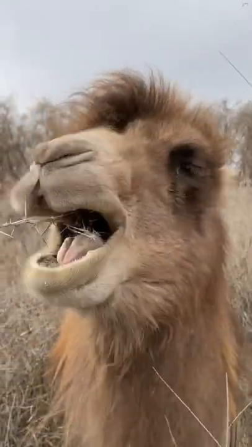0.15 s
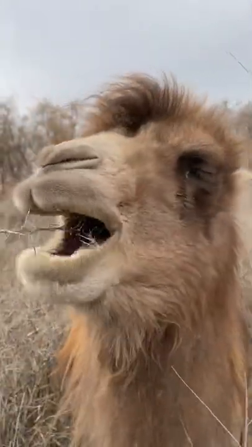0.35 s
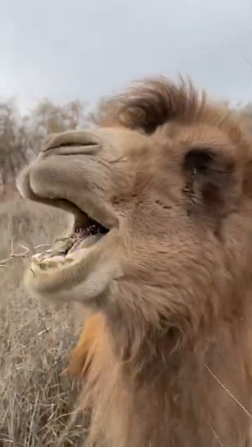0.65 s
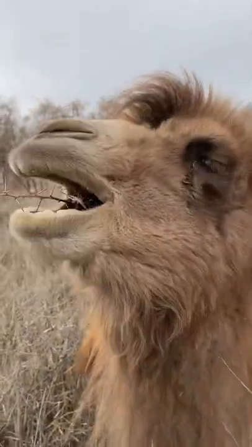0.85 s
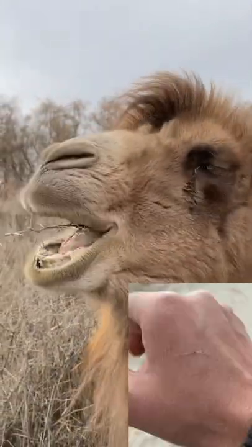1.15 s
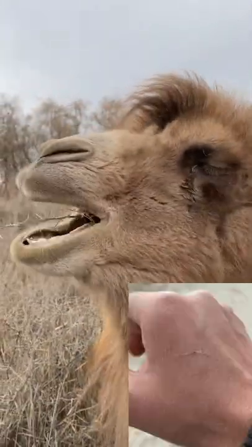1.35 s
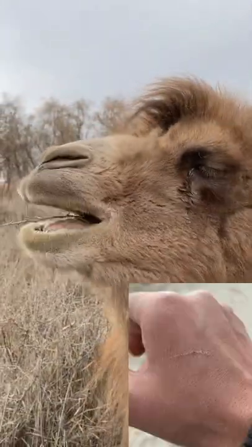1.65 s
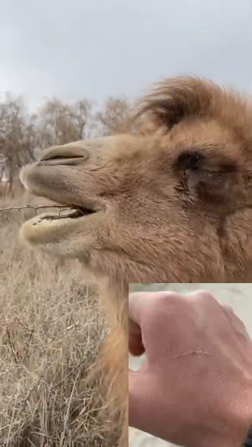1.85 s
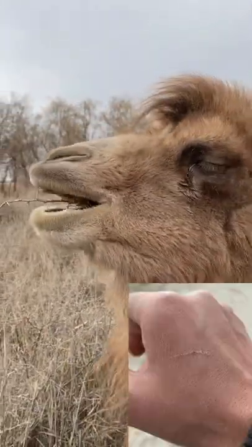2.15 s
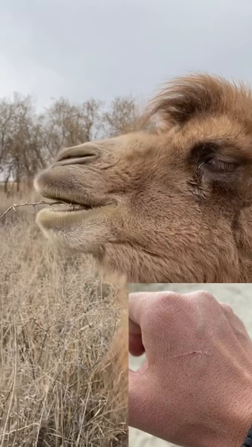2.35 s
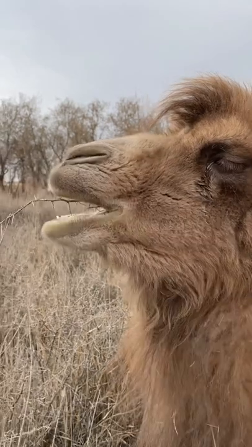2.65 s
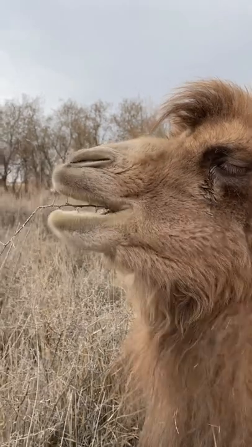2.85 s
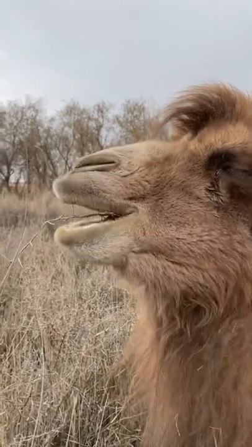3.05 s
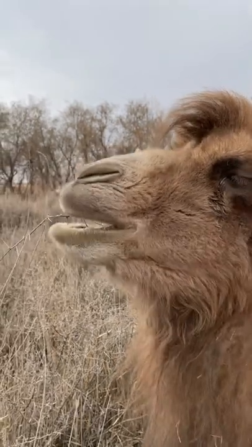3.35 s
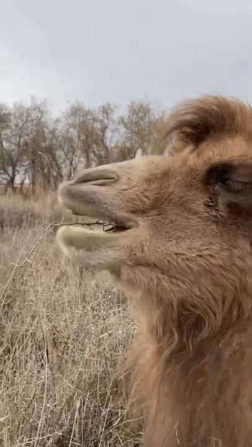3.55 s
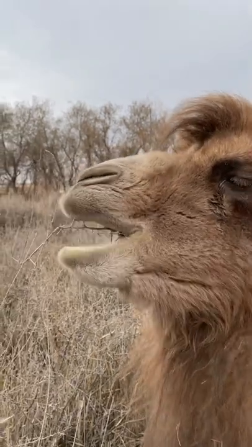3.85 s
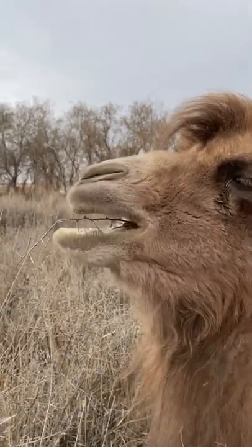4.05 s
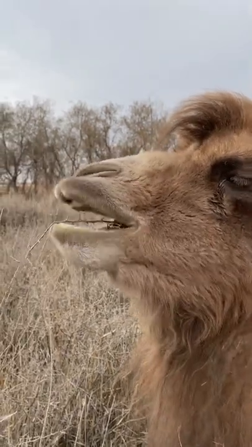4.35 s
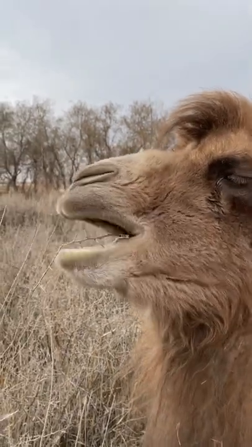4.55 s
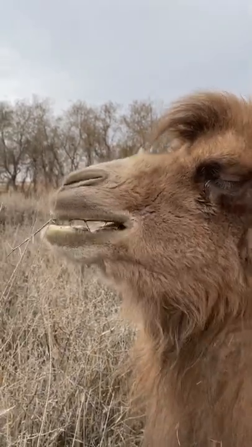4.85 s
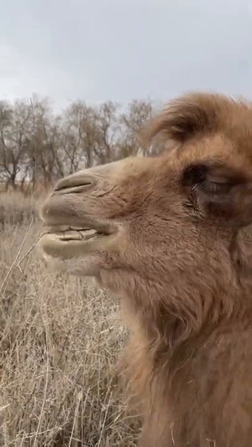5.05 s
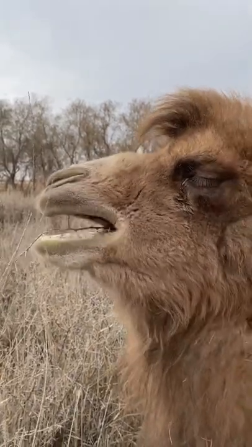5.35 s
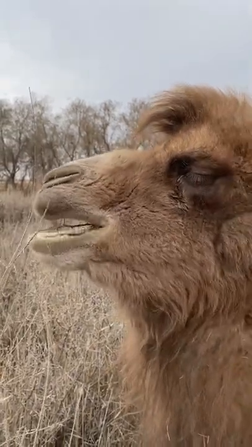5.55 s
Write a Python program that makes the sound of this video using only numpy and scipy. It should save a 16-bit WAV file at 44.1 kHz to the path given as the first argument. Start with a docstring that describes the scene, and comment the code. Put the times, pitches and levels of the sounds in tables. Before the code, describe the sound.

A camel chews dry, thorny twigs right beside a small stereo phone microphone on open, windy scrubland. At the start a few brittle crackles and faint grinding sound over low wind rumble, with a dull buffet at 0.2 s and a crisp tick at 0.33 s. Small snaps come at 1.0 and 1.13 s. Near 1.8 s the hardest, brightest snap cracks out, with crumbs and a swell of rustling stems, followed by more thin, high snaps from 2.1 to 2.9 s while the wind is quiet. From about 3 s many breaks follow at lower, woodier pitches, with a short crunch at 3.3 s. Wind thumps at 4.2 s, stems rustle at 4.4 s, then crunching strokes thicken from 4.5 to 4.8 s with soft jaw knocks and gentler wind bumps to 5.0 s. The strongest crush, with a faint creak, comes around 5.2-5.3 s, ringing hollow in the mouth, and small crackles continue to the end at 5.7 s.

```python
"""On open scrubland a camel, close to a phone with two microphone ports, chews dry thorny twigs.
From the start thorns snap, crumble and are ground over light wind that rumbles and thumps on the ports.
The hardest snap comes near 1.8 s amid rustling stems; from about 3 s many breaks ring at lower pitches.
After 4 s the wind thumps again, and toward the end the crushing is stronger and the mouth rings hollow.
Noise and clicks through resonances make the crushing and rustle; damped sines make rings, knocks and thumps."""
import sys
import numpy as np
from scipy import signal
from scipy.fft import rfft, irfft
from scipy.io import wavfile
from scipy.ndimage import uniform_filter1d

SR = 44100
rng = np.random.default_rng(int(sys.argv[2]) if len(sys.argv) > 2 else 0)


def log_audio(samples):
    """Write samples as a 16-bit WAV file to the path given in sys.argv[1]."""
    # one column per channel
    frames = np.atleast_2d(samples).T
    # limit to full scale, then quantise
    limited = np.clip(frames, -1, 1)
    pcm = np.round(limited * 32767).astype(np.int16)
    wavfile.write(sys.argv[1], SR, pcm)


N = 250488

# breaking thorns and stems: (time [s], level [dB], ring [Hz], broad crack relative to the break [dB],
# echo in the mouth relative to the break [dB])
BREAKS = [(0.004, -32.5, 1620, -15.5, -7), (0.034, -36, 2270, -17.5, 0), (0.079, -40, 5360, -13.5, -18),
          (0.276, -45, 2700, -14, -17), (0.31, -48, 3250, -11, -20), (0.3322, -26.5, 5800, -21.5, -41),
          (0.393, -47.5, 5500, -14.5, -34), (0.581, -46, 730, -39, 2), (0.662, -43, 5100, -12.5, -23),
          (0.686, -39.5, 4160, -10, -37), (1.0014, -31, 1560, -26, -11), (1.11, -45, 2600, -27, -2),
          (1.128, -27.5, 6400, -57, -34), (1.1464, -44.5, 5470, -12, -12), (1.368, -45, 5040, -7, 0),
          (1.685, -35.5, 5730, -23, -11), (1.768, -15.5, 5240, -17.5, -42), (2.115, -21.5, 5780, -35, -55),
          (2.162, -30.5, 6160, -28, -41), (2.184, -26.5, 6300, -55, -44), (2.339, -33.5, 1720, -28, -32),
          (2.3595, -46, 2000, -40, -15), (2.366, -45, 2540, 0, 7), (2.39, -32, 6040, -32, -19),
          (2.405, -43, 1810, -20, -18), (2.685, -27.5, 5980, -40, -48), (2.754, -33.5, 5930, -26.5, -35),
          (2.944, -28.5, 5860, -30, -44), (3.045, -35.5, 1950, -47, -1.5), (3.061, -44, 2100, -40, 1),
          (3.094, -40.5, 1890, -21, 0), (3.216, -36, 2300, -24, -6), (3.276, -47, 2330, 3, -14),
          (3.296, -31, 1540, -29, -8.5), (3.316, -52, 1260, -9, -1), (3.411, -46.5, 1500, -36, -2),
          (3.513, -46.5, 6400, -8, -5), (3.702, -33.5, 2210, -24.5, -8), (3.807, -28.5, 917, -28, -39),
          (3.839, -45.5, 1130, -39, 2), (3.856, -38, 5370, -47, -11), (3.908, -48, 2900, -11.5, 12),
          (3.917, -47, 1500, -12, 1), (3.931, -45, 1630, -17.5, 7.5), (3.99, -38, 3070, -31, -3),
          (4.005, -46, 1600, -20, -7), (4.051, -37, 1870, -23, 6), (4.071, -32, 2950, -26, -7),
          (4.115, -32.5, 4600, -40, -13), (4.128, -33, 2800, -26, -32), (4.152, -31, 4340, -31, -6.5),
          (4.243, -35, 2900, -11.5, 0.5), (4.287, -34, 2920, -38, -2), (4.31, -37.5, 2010, -13.5, -3),
          (4.526, -32.5, 6370, -33, -14), (4.582, -26, 2300, -21.5, -2.5), (4.608, -27, 2060, -28, 2),
          (4.682, -28.5, 1505, -53, 2.5), (4.728, -34, 1630, -51, 1.5), (4.738, -34.5, 1370, -39, -18),
          (4.776, -43, 1360, -33, -10), (4.805, -38, 6540, -8, -25), (4.8212, -43.5, 2930, -12, -10),
          (4.933, -32.5, 1265, -25, -1), (5.008, -39, 3800, -34, -9), (5.185, -49, 1400, -36, -3),
          (5.256, -24.5, 1495, -35, -8), (5.285, -36.5, 1230, -23, 3), (5.314, -28, 1190, -47, 9.5),
          (5.314, -22, 5260, -51, -35), (5.354, -44, 2480, -37, 9), (5.51, -41.5, 1710, -42, 8),
          (5.523, -41, 1560, -31, -7), (5.556, -49.5, 2980, -40, 12), (5.568, -42, 1640, -46, -17),
          (5.644, -32.5, 1980, -30, 5.5)]
# colour of dry stems: (frequency [Hz], relative level [dB])
STEM_COLOUR = [(900, -8), (2500, 0), (4500, 6.5), (6500, 12), (8800, 1.5), (12000, 9), (15400, 7),
               (16100, -99)]


def gain_of(db):
    """Amplitude factor of a level in dB."""
    return 10 ** (np.asarray(db) / 20)


def evened(x):
    """The sound brought to an rms of one."""
    return x / np.sqrt(np.mean(x ** 2) + 1e-20)


def add(mix, s, sound):
    """Lay a sound into the mix from time s, cut at the end of the mix."""
    part = mix[round(s * SR):][:len(sound)]
    part += sound[:len(part)]


def read(points, hz):
    """Read a table of values along a logarithmic frequency axis."""
    f, value = np.transpose(points)
    return np.interp(np.log(hz + 1), np.log(f + 1), value)


def level_curve(table):
    """Gain over time, with straight lines in dB between the points."""
    s, db = np.transpose(table)
    return gain_of(np.interp(np.arange(N) / SR, s, db, left=-120, right=-120))


def swells(s, length, db, rise_db_per_s, fall_db_per_s):
    """Each row swells up to its level, holds and dies away; the powers add."""
    late = np.arange(N) / SR - s[:, None]
    rise_db = np.minimum(rise_db_per_s * late, 0)
    fall_db = -fall_db_per_s * (late - length)
    slope_db = np.minimum(rise_db, fall_db)
    return np.sqrt((gain_of(db[:, None] + slope_db) ** 2).sum(0))


def coloured(x, spectrum):
    """Weight the spectrum of a sound by a table of levels."""
    hz = np.fft.rfftfreq(x.shape[-1], 1 / SR)
    return irfft(rfft(x) * gain_of(read(spectrum, hz)), x.shape[-1])


def ringing(x, hz, width):
    """A double complex pole: a resonance with steep skirts."""
    pole = np.exp((2j * np.pi * hz - np.pi * width) / SR)
    return signal.lfilter([(1 - abs(pole)) ** 2], [1, -2 * pole, pole ** 2], x)


def resonate(x, hz, width):
    """The real sound of one such resonance."""
    return 2 * ringing(x, hz, width).real


def grains(per_s, spread_db, count):
    """Sparse clicks of random sign; a few are large."""
    size = gain_of(spread_db * np.minimum(rng.exponential(1, count), 4))
    sign = rng.choice([-1., 1.], count)
    return size * sign * (rng.random(count) < per_s / SR)


def diffuse(make):
    """Sound from all around: the two ports hear partly the same, partly unrelated sound."""
    # (frequency [Hz], likeness of the two ports [0 to 1])
    likeness = [(60, .8), (200, .5), (700, .3), (2000, .5), (5000, .6), (7000, .98), (9300, .85),
                (11000, .98), (12600, .8), (14000, .98)]
    left, other = rfft(make()), rfft(make())
    alike = np.clip(read(likeness, np.fft.rfftfreq(N, 1 / SR)), 0, 1)
    right = alike * left + np.sqrt(1 - alike ** 2) * other
    return irfft([left, right], N)


def patchy(x, patchy_db):
    """Level drifts in random patches of about 800 Hz by 60 ms, alike at both ports."""
    z = signal.stft(x, nperseg=256)[2]
    field = rng.standard_normal(z.shape[1:])
    field = uniform_filter1d(field, size=5, axis=0)  # over frequency
    field = uniform_filter1d(field, size=20, axis=1)  # over time
    return signal.istft(z * gain_of(patchy_db * evened(field)), nperseg=256)[1][:, :N]


def low_blows(table, rise_cycles, sag):
    """Damped swings with a soft start; the pitch sags to its value within a cycle or two."""
    out, t = np.zeros(N), np.arange(SR // 2) / SR
    for s, db, hz, t60 in table:
        shape = (1 - np.exp(-t * hz / rise_cycles)) ** 2 * gain_of(-60 * t / t60)
        turns = hz * t + sag * (1 - np.exp(-t * hz / 0.5))
        add(out, s, gain_of(db) * shape / shape.max() * np.sin(2 * np.pi * turns))
    return out


def wind():
    """Lumpy rumble of shaped noise with low damped buffets on the ports, over the air of the plain."""
    # colours of the rumble and of the air: (frequency [Hz], relative level [dB])
    rumble_colour = [(20, -39), (40, 2.5), (62, 1), (90, -11), (130, -21), (250, -45.5)]
    air_colour = [(25, -39), (70, 8), (200, -1.5), (600, -11.5), (1600, -19), (5000, -18), (9000, -74)]
    # slow drift of the rumble, and level of the air: (time [s], level [dB])
    breeze = [(0, -50), (.62, -60.5), (.96, -57), (2.6, -71), (2.85, -53), (4.1, -61), (4.6, -52.5),
              (5.68, -51.5)]
    air_level = [(0, -60.5), (1.2, -60), (2.7, -62), (4.2, -61), (5.68, -58.5)]
    # tops of the gusts: (time [s], level [dB])
    gust_tops = [(0.058, -39.5), (.24, -38), (4.212, -37.5), (5.052, -37.5), (5.53, -42.5), (5.68, -37.5)]
    # buffets: (time [s], level [dB], pitch [Hz], 60 dB decay [s])
    thumps = [(0.21, -22.5, 66.7, 0.075), (4.193, -23, 52.7, 0.11), (4.257, -31.5, 56, 0.24),
              (4.822, -35.5, 58.3, 0.42), (4.91, -30.5, 73.5, 0.12), (5.027, -33, 61.6, 0.1)]

    rumble = evened(diffuse(lambda: coloured(rng.standard_normal(N), rumble_colour)))
    air = evened(diffuse(lambda: coloured(rng.standard_normal(N), air_colour)))
    air = patchy(air, patchy_db=3.0)
    s, db = np.transpose(gust_tops)
    gusts = swells(s, 0, db, rise_db_per_s=285, fall_db_per_s=87)
    strength = np.hypot(level_curve(breeze), gusts)
    buffets = low_blows(thumps, 1.0, sag=0.38)
    both_ports = np.array([buffets, np.roll(buffets, 40)])  # the right port is 40 samples late
    return strength * rumble + both_ports + level_curve(air_level) * air


def ticks():
    """Stems of ten thicknesses each tick at their own pitch and moments."""
    pitches = np.geomspace(1200, 15000, 10)
    rung = sum(resonate(grains(2500, 4.4, count=N), hz, 0.39 * hz) for hz in pitches)
    return coloured(rung, STEM_COLOUR)


def rustle():
    """Dense tiny ticks of brittle stems rubbing."""
    # (time [s], level [dB])
    rubbing = [(0, -69), (.36, -61), (.49, -66.5), (.63, -54.5), (.79, -64), (1.28, -63), (1.87, -48.5),
               (2.22, -63.5), (2.48, -58.5), (2.72, -70.5), (3.02, -55.5), (3.6, -58), (4.15, -67),
               (4.37, -46.5), (4.45, -55.5), (4.9, -55.5), (5.1, -59), (5.68, -54)]
    return level_curve(rubbing) * patchy(evened(diffuse(ticks)), patchy_db=4.0)


def knocks():
    """Soft knocks of jaw and tongue, as short damped swings."""
    # (time [s], level [dB], pitch [Hz], 60 dB decay [s])
    blows = [(0.582, -42, 325, 0.013), (1.368, -45, 350, 0.0059), (1.544, -53.5, 371, 0.18),
             (1.772, -41, 808, 0.061), (3.689, -44, 650, 0.0072), (3.693, -46.5, 208, 0.033),
             (4.807, -38.5, 190, 0.063), (4.805, -40.5, 500, 0.026), (5.565, -39.5, 360, 0.038)]
    return low_blows(blows, 0.18, sag=0.26)


def creaks():
    """A thick stem creaks as it is bent: dense slips of the fibres ring one narrow note."""
    # (start [s], length [s], level [dB], note [Hz])
    bends = [(1.148, 0.012, -50.5, 1057), (4.754, 0.025, -53, 1610), (5.218, 0.051, -45, 1000),
             (5.654, 0.0075, -48.5, 960)]
    out = np.zeros(N)
    for s, length, db, hz in bends:
        held = swells(np.array([s]), length, np.array([db]), rise_db_per_s=2200, fall_db_per_s=1300)
        out += held * evened(resonate(grains(3300, 1.3, count=N), hz, 177))
    return out


def mouth(excite):
    """The resonances between tongue and palate; the gap is too small to sound below them."""
    # (frequency [Hz], width [Hz], relative level [dB])
    resonances = [(1022, 160, 5.5), (1635, 600, 6), (2225, 1180, 3.5), (2560, 920, 2.5), (5380, 1400, -7.5)]
    rung = sum(gain_of(db) * resonate(excite(), hz, width) for hz, width, db in resonances)
    return signal.sosfilt(signal.butter(2, 850, "high", fs=SR, output="sos"), rung)


def crushing_pressure():
    """The molars crush a stem in strokes; between them the grinding all but stops."""
    # (start [s], length [s], level [dB])
    strokes = [(0.0, 0.26, -68), (0.297, 0.012, -63), (0.582, 0.047, -69), (1.055, 0.15, -65.5),
               (1.769, 0.08, -59.5), (2.037, 0.0064, -59), (2.39, 0.11, -65), (3.035, 0.09, -65),
               (3.28, 0.025, -52), (3.896, 0.042, -58), (3.984, 0.0038, -67), (4.23, 0.18, -59),
               (4.549, 0.15, -55.5), (4.726, 0.067, -53.5), (4.939, 0.011, -53.5), (5.226, 0.08, -48.5),
               (5.503, 0.061, -63), (5.643, 0.047, -58)]
    idle_db = -113.5
    s, length, db = np.transpose(strokes)
    return gain_of(idle_db) + swells(s, length[:, None], db, rise_db_per_s=902, fall_db_per_s=327)


def hollow_ring(pressure):
    """Low ring of the closed mouth, gliding with the jaw, kicked by small fractures and by each break."""
    # (start [s], length [s], level [dB], first pitch [Hz], last pitch [Hz])
    glides = [(3.79, 0.58, -58, 447, 333), (4.503, 0.44, -58.5, 435, 413), (4.95, 0.73, -59, 405, 466)]
    crush_db, break_db = 68, 52  # how strongly crushing and breaks drive the hollow
    out = np.zeros(N)
    kicks = grains(120, 4.0, count=N) * (1 + gain_of(crush_db) * pressure)
    for s, db, _, _, mouth_db in BREAKS:
        add(kicks, s, gain_of([db + mouth_db + break_db]))
    for s, length, db, first_hz, last_hz in glides:
        part = np.linspace(0, 1, round(length * SR))
        turn = np.exp(2j * np.pi * np.cumsum(first_hz + (last_hz - first_hz) * part) / SR)
        # shift the glide down to 0 Hz, resonate there, and shift it back up
        still = kicks[round(s * SR):][:len(part)] / turn + 1e-18
        rung = (turn * ringing(still, 0, 65)).real
        swell = np.sin(np.pi * part ** 1.38)  # tops a little after the middle
        add(out, s, gain_of(db) * swell * evened(rung))
    return out


def grinding():
    """Small fractures between the molars ring the mouth's resonances, each in its own time, and its low hollow."""
    # (frequency [Hz], relative level [dB])
    crush_colour = [(1000, 4.5), (2000, -2.5), (3000, 5), (6000, 5)]
    pressure = crushing_pressure()
    fractures = mouth(lambda: grains(2000, 6.5, count=N))
    return pressure * evened(coloured(fractures, crush_colour)) + hollow_ring(pressure)


def snaps():
    """Each break is a click, its echo in the mouth, a broad crack, a short ring and crumbs at the same pitch."""
    # thin brittle thorns crumble most: (ring [Hz], crumb level before the growth term [dB])
    crumb_level = [(1000, -35), (4700, -37), (5200, -32.5)]
    crumb_growth = 0.5  # dB of crumbs per dB of break: they grow more slowly than the break
    out, t = np.zeros(N), np.arange(3072) / SR
    chance = rng.standard_normal((len(BREAKS), len(t)))
    for (s, db, hz, crack_db, mouth_db), noise in zip(BREAKS, chance):
        # ring: thick pieces ring longer, and the pitch drops as the crack runs through
        shape = (1 - np.exp(-t * hz / 2.63)) ** 2 * gain_of(-60 * t / (0.002 + 7.0 / hz))
        turns = hz * t + 0.64 * (1 - np.exp(-t * hz / 1.26))
        ring = shape / shape.max() * np.sin(2 * np.pi * turns)

        # click and echo: the fibres part within two milliseconds
        parting = np.exp(-((t - .0012) / 0.00035) ** 2) * np.roll(noise, 999)
        click = resonate(parting, 1.4 * hz, 0.75 * hz)
        click = gain_of(-6.0) * click / abs(click).max()
        echo = mouth(lambda: parting)
        echo = gain_of(mouth_db) * echo / abs(echo).max()

        # broad crack: a burst, then splinters
        burst = np.exp(-((t - .001) / .0009) ** 2)
        splinters = np.minimum(t / 0.0017, 1) * gain_of(-5.0 - 60 * t / 0.076)
        crack = evened(coloured(noise, STEM_COLOUR)) * gain_of(crack_db + 12.5) * (burst + splinters)

        # crumbs: spiky noise at the ring's pitch and in the mouth
        crumb_db = read(crumb_level, hz) + (crumb_growth - 1) * db
        grit = noise[::-1] * abs(noise[::-1]) ** 3
        crumbs = evened(resonate(grit, hz, 0.47 * hz))
        crumbs = crumbs + gain_of(mouth_db - 23) * evened(mouth(lambda: grit))
        crumbs = crumbs * np.minimum(t / 0.0036, 1) * gain_of(crumb_db - 60 * t / 0.14)

        add(out, s, gain_of(db) * (ring + click + echo + crack + crumbs))
    return out


def scattered(x):
    """A few milliseconds of reflections off fur and brush, different at each port."""
    t = np.arange(400) / SR
    taps = rng.standard_normal((2, len(t))) * gain_of(-60 * t / .01)
    taps = taps / np.linalg.norm(taps, axis=1, keepdims=True)
    return signal.oaconvolve(x[None], taps, axes=1)[:, :N]


def scene():
    """The chewing close to the microphone ports, with rustle and wind around it."""
    camel = snaps() + grinding() + creaks() + knocks()
    direct = camel * gain_of([[.4], [-.4]])  # a little louder at the left port
    near = direct + gain_of(-8) * scattered(camel)
    return near + rustle() + wind()


def record(dry):
    """Gain control lowers all but the bass while wind pounds; the right channel's treble phase turns in steps;
    band limit."""
    # phase of the right channel turns against the left over the treble, in steps: (frequency [Hz], phase turned
    # back [half turns])
    phase_steps = [(0, 0), (5000, 0), (7000, .98), (8600, 1.03), (9900, 1.98), (11600, 2.02), (13400, 2.98),
                   (14800, 3), (15300, 3.25)]
    bass = signal.sosfiltfilt(signal.butter(2, 150, fs=SR, output="sos"), dry)
    power_db = 10 * np.log10(abs(uniform_filter1d(bass.mean(0) ** 2, 2000)) + 1e-12)
    cut_db = .6 * np.maximum(power_db + 40, 0)  # acts when the bass power is above -40 dB
    ducked = bass + (dry - bass) / gain_of(cut_db)
    hz = np.fft.rfftfreq(N, 1 / SR)
    phase_turn = np.exp(-1j * np.pi * np.interp(hz, *np.transpose(phase_steps)))
    ports = np.array([ducked[0], irfft(rfft(ducked[1]) * phase_turn, N)])
    low_pass = signal.firwin(511, 16600, window=("kaiser", 9), fs=SR)  # edge in Hz
    return signal.oaconvolve(ports, low_pass[None], "same")


dry = scene()
out = record(dry)
log_audio(out)
```